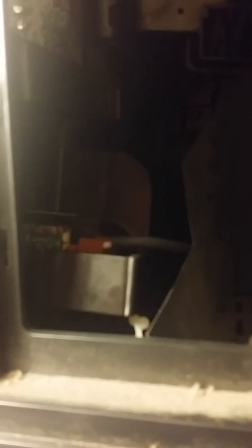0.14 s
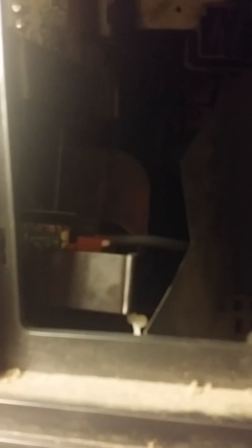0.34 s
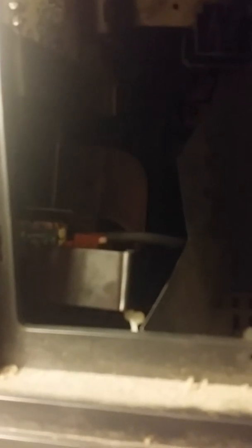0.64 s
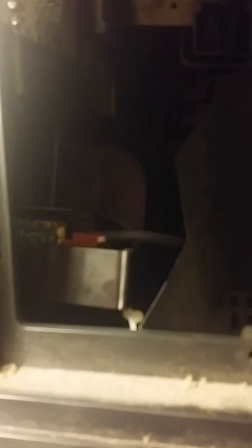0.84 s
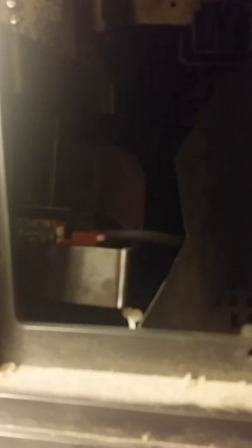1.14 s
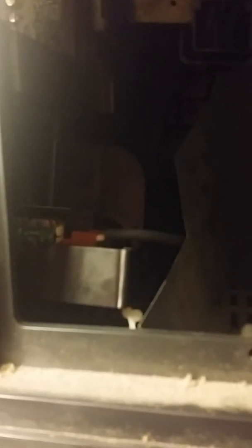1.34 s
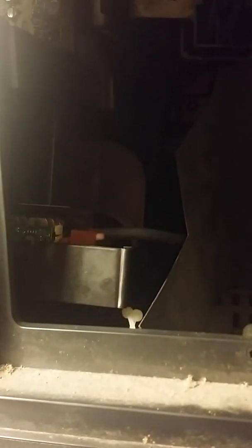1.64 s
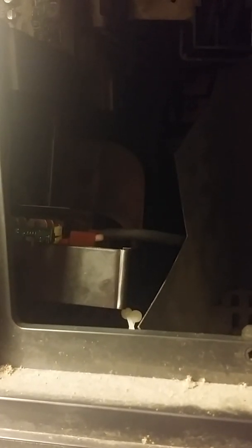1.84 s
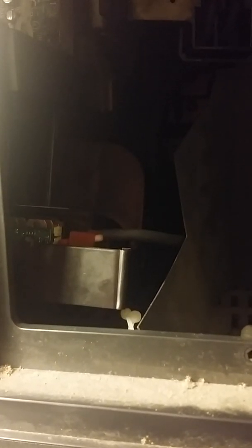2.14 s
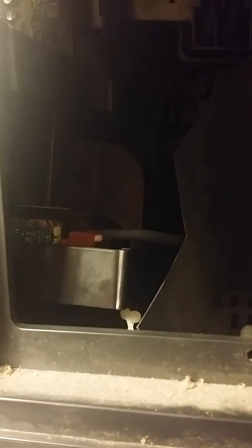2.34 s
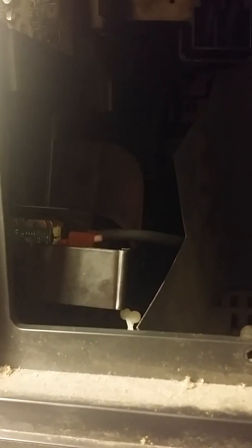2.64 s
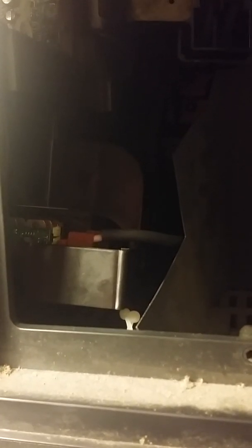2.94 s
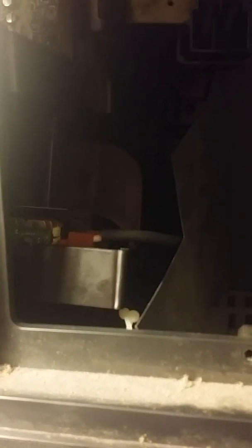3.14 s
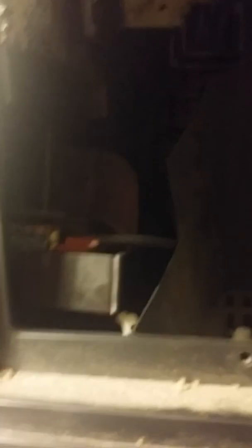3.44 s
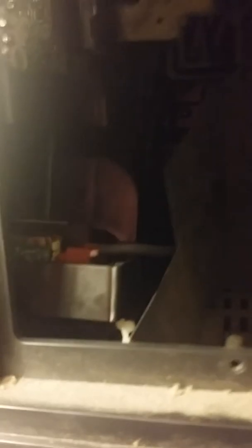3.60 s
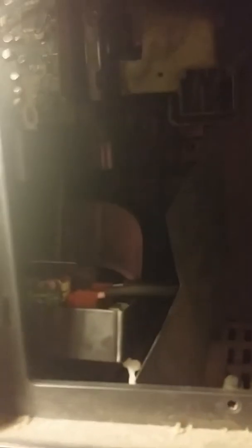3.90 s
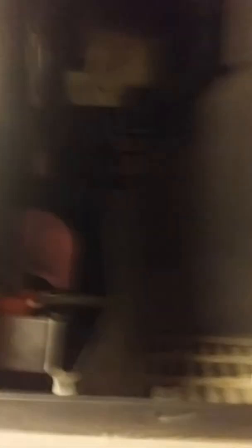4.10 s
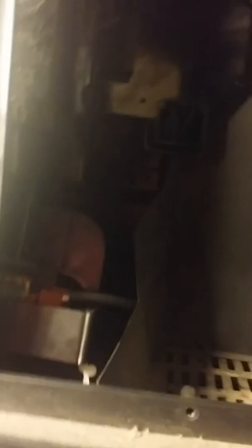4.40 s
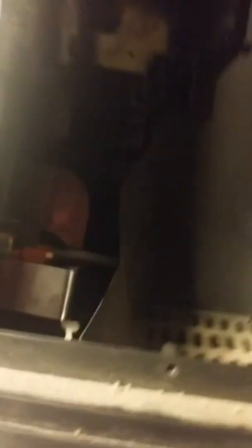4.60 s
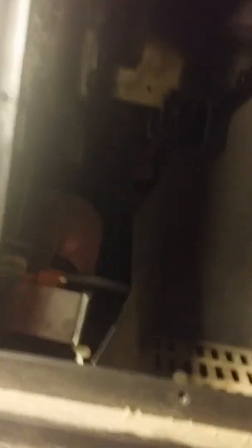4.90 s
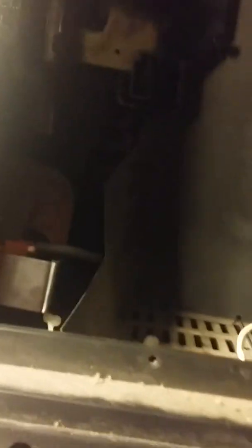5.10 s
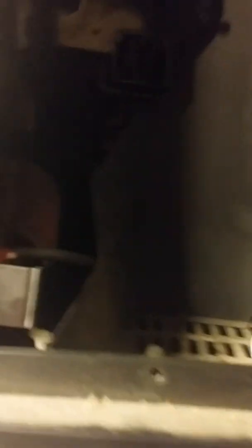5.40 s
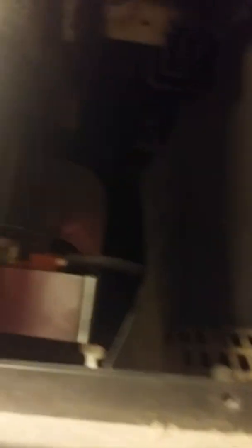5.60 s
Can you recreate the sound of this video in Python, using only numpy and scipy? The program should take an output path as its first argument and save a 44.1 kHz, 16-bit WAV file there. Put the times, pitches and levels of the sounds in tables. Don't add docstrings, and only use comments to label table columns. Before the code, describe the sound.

Close to an open electronics cabinet, cooling fans keep up a steady low hum with soft airflow and a faint motor whine. Around two seconds a single knock sounds across the room. From just after three seconds a finger creeps over the right microphone, building to loud scrapes, pops and low thumps past four seconds. The fan sound dips, then recovers, with faint rubbing at the end.

```python
import sys
import numpy as np
from scipy import signal
from scipy.fft import rfft, irfft, next_fast_len
from scipy.io import wavfile
from scipy.ndimage import uniform_filter1d, minimum_filter1d, map_coordinates

SR = 44100
rng = np.random.default_rng(int(sys.argv[2]) if len(sys.argv) > 2 else 0)


def inscribe(sig):
    pcm = np.round(np.clip(np.atleast_2d(sig).T, -1, 1) * 32767)
    wavfile.write(sys.argv[1], SR, pcm.astype(np.int16))


def to_linear_factor(level_db):
    exponent = np.asarray(level_db, float) / 20
    return 10 ** exponent


N = 253575


def unit(x):
    return x / np.sqrt(np.mean(x ** 2) + 1e-20)


def along(points, f_hz):
    knots_hz, *cols = np.transpose(points)
    return np.array([np.interp(np.log(f_hz + 1), np.log(knots_hz + 1), c) for c in cols])


def curve(rows):
    return np.interp(np.arange(N) / SR, *np.transpose(rows))


def wobble(rate_hz):
    coarse = np.arange(0, N + 32, 32)
    knots = rng.standard_normal(int(N * rate_hz / SR) + 4)
    return np.interp(np.arange(N), coarse, map_coordinates(knots, [coarse * rate_hz / SR]))


def filtered(x, response):
    m = next_fast_len(N + SR // 2)
    return irfft(rfft(x, m) * response(np.fft.rfftfreq(m, 1 / SR)), m)[..., :N]


def coloured(x, table):
    return filtered(x, lambda f: to_linear_factor(along(table, f)[0]))


def peak(f, hz, width_hz):
    return 1j * f * width_hz / (hz * hz - f * f + 1j * f * width_hz)


# f/Hz, coherence/1
LIKENESS = [(60, .97), (400, .87), (900, .5), (2000, .45), (3500, .2), (8000, .1)]
LEAD_S = 17 / 44100


def to_ports(pair, colours):
    def mix(f):
        turn_rad = np.arccos(np.clip(along(LIKENESS, f)[0], 0, 1)) / 2
        return np.array([np.cos(turn_rad), np.sin(turn_rad)])

    def colour_and_lag(f):
        return to_linear_factor(along(colours, f)) * np.exp(-2j * np.pi * f * np.array([[0], [LEAD_S]]))

    mid, side = filtered(pair, mix)
    return filtered(np.array([mid + side, mid - side]), colour_and_lag)


def tone(phase, left_db, right_db, lead_rad, sway_db):
    phase = phase + 2 * np.pi * rng.random()
    level_db = sway_db * wobble(9) + np.array([[left_db], [right_db]])
    return np.sqrt(2) * to_linear_factor(level_db) * np.sin([phase + lead_rad, phase])


# t/s, turns/Hz
SHAFT_SPEED = [(0, 36.32), (2.7, 36.34), (5.75, 36.375)]
# multiple of shaft, left/dB, right/dB, left lead/rad
SHAFT_ORDERS = [(4, -63.3, -60.6, 0.1), (5, -67.0, -65.6, 0.1), (7, -50.7, -45.3, 0.3),
                (8, -68.3, -62.9, 0.4), (12, -69.7, -71.8, 0.5), (14, -67.7, -64.8, 1.0),
                (16, -64.3, -64.2, -0.3), (20, -58.3, -54.6, 0.9), (24, -68.8, -66.2, -1.6),
                (28, -75.7, -58.5, 1.0), (32, -56.5, -64.6, 2.0), (36, -63.7, -64.8, 1.2),
                (40, -73.8, -71.2, 2.9), (44, -72.0, -71.9, 2.5)]
MOVED_ORDERS = {20: (-1.8, 3, 0.18), 28: (3.6, -4, .6), 32: (1, 8.4, -0.61)}


def fan_orders():
    turns = 2 * np.pi * np.cumsum(curve(SHAFT_SPEED) + 0.014 * wobble(3.25)) / SR
    away = curve([(5.15, 0), (5.45, 1)])
    out = 0
    for k, left_db, right_db, lead_rad in SHAFT_ORDERS:
        *shift_db, turn_rad = MOVED_ORDERS.get(k, (0, 0, 0))
        order = tone(k * turns, left_db, right_db, lead_rad + turn_rad * away, sway_db=1.34)
        out += to_linear_factor(np.outer(shift_db, away)) * order
    return out


# f/Hz, left/dB, right/dB, left lead/rad
STEADY_TONES = [(56.7, -60.0, -54.6, -0.1), (120, -62.5, -50.1, -0.1), (409.7, -66.7, -66.5, 1.0),
                (546.9, -61.9, -66.1, 0.8), (683.7, -67.7, -59.9, 0.3), (992.5, -77.2, -61.2, 1.7),
                (1136, -68.6, -73.1, -1.4), (1667.5, -62.5, -69.5, -2.0), (1916, -77.6, -76.8, -1.3)]


def hum_and_second_motor():
    clock = 2 * np.pi * np.arange(N) / SR
    out = 0
    for hz, *rest in STEADY_TONES:
        out += tone(hz * clock + hz / 1500 * wobble(3.835), *rest, sway_db=1.5)
    return out


# f/Hz, width/Hz, left/dB, right/dB
MOTOR_FRAME = [(4800, 600, -76, -84), (5140, 260, -78, -79), (6250, 800, -69, -84), (10700, 700, -88, -74),
               (14200, 900, -84, -70)]


def motor_whine():
    count = np.floor(np.cumsum(136.77 * (1 + 0.0008 * wobble(6))) / SR)
    ticks = unit(np.diff(count, prepend=0) * (-1) ** count * to_linear_factor(2.5 * rng.standard_normal(N)))
    echoes = rng.standard_normal((2, 2000)) * to_linear_factor(-60 * np.arange(2000) / SR / .06)
    ticks = unit(signal.fftconvolve(ticks[None], echoes, axes=1)[:, :N])

    def frame(f):
        return sum(np.outer(to_linear_factor(db), peak(f, hz, w) ** 2) * np.sqrt(SR / w / 0.79)
                   for hz, w, *db in MOTOR_FRAME)

    return filtered(ticks, frame) * to_linear_factor(curve([(3.6, 0.5), (4.6, -2.5)]))


def grains(rate_hz, spread_db):
    hit, size, sign = rng.random((3, N))
    return (hit < rate_hz / SR) * to_linear_factor(-spread_db * np.log(size + 0.0098)) * np.sign(sign - .5)


# t/s, length/s, speed level/dB, pressure/0-1
CREEPS = [
    (3.25, .085, -55, .3),
    (3.364, 0.044, -62, 0.72),
    (3.425, 0.19, -54, 0),
    (3.591, 0.081, -47.5, 0),
    (3.675, .13, -47, 0),
    (3.81, .071, -42, 0.02),
    (5.232, 0.33, -60.5, 0.3),
]
# t/s, length/s, speed level/dB, pressure/0-1, swell/dB
SLIDES = [(3.875, 0.031, -48.5, 0, -8), (3.928, .024, -30, 0.39, -11.5), (3.953, 0.055, -34, 0.09, 0),
          (3.997, .05, -46, 0.19, 11), (4.049, 0.039, -37, 0.06, -2), (4.08, 0.036, -49.5, .4, 5),
          (4.12, 0.09, -34, 0.47, -3), (4.211, 0.074, -42, 0, -9), (4.285, 0.018, -32.5, 1.02, 13),
          (4.306, 0.018, -38, 1.03, -13), (4.336, 0.072, -39, 1, 6), (4.404, .063, -40.5, 0.99, 8),
          (4.467, 0.045, -39, 1.01, 3), (4.519, 0.084, -48, 0.65, -1), (4.59, .11, -67.5, 0.75, 13),
          (5.422, .2, -60.5, 0.1, 22), (5.62, .14, -51, 0, 0)]
CREEP_SWELL_DB = 5.5
BOOM_DB, BOOM_PRESSED_DB, BOOM_BENDS = -18.5, 40.5, 1.94
SCRAPE_DB, SCRAPE_PRESSED_DB = -6, 18.5


def finger_strokes():
    t, gains = np.arange(N) / SR, np.full((3, N), 1e-9)
    strokes = [(*row, CREEP_SWELL_DB) for row in CREEPS] + SLIDES
    for s, length_s, speed_db, press, swell_db in strokes:
        near = slice(round((s - .01) * SR), round((s + length_s + .01) * SR))
        u = (t[near] - s) / length_s
        edge = np.clip(np.minimum(u, 1 - u) * length_s / .005 + .5, 0, 1)
        boom_db = BOOM_DB + BOOM_PRESSED_DB * abs(press) ** BOOM_BENDS
        layers_db = np.array([boom_db, SCRAPE_DB + SCRAPE_PRESSED_DB * press, 0])
        gains[:, near] += edge * to_linear_factor(speed_db + layers_db[:, None] + swell_db * (np.clip(u, 0, 1) - .5))
    return gains


# f/Hz, width/Hz, level/dB
PORT_CAVITY = [(420, 510, 5.5), (650, 170, -12)]


def cavity_boom():
    def cavity(f):
        rings = sum(to_linear_factor(db) * peak(f, hz, w) for hz, w, db in PORT_CAVITY)
        return rings ** 2 / (1 + (f / 900) ** 8)

    return unit(filtered(grains(rate_hz=800, spread_db=1.0), cavity))


# f/Hz, level/dB per Hz
SCRAPE_COLOUR = [(60, -11), (200, -16), (750, -3), (1200, -2.5), (2800, -3.5), (5000, -12.5), (7500, -31),
                 (9000, -42)]


def skin_scrape(cover):
    def open_and_covered(f):
        return to_linear_factor(along(SCRAPE_COLOUR, f)) * [1 + 0 * f, 1 / (1 + (f / 1500) ** 2)]

    open_port, covered = filtered(grains(rate_hz=3700, spread_db=2.5), open_and_covered)
    return 1.46 * ((1 - cover) * unit(open_port) + cover * unit(covered))


# f/Hz, level/dB per Hz
FIZZ_COLOUR = [(3000, -24), (6000, -7), (7700, -9), (9500, -3), (13000, -4), (15500, -6)]
# f/Hz, level/dB
CASE_LEAK = [(1500, -40), (4300, -2), (6500, 19), (8500, 2), (11000, -18), (15500, -30)]


def finger():
    gains = finger_strokes()
    cover = np.clip(gains[0] / gains[1], 0, 1)
    fizz = unit(coloured(grains(rate_hz=25000, spread_db=1.6), FIZZ_COLOUR))
    lumps = to_linear_factor([2.8 * wobble(60), 2.3 * wobble(80), 1.1 * wobble(60)])
    right = (gains * lumps * [cavity_boom(), skin_scrape(cover), fizz]).sum(0)
    leak = unit(coloured(grains(rate_hz=8000, spread_db=2), CASE_LEAK))
    leak *= to_linear_factor(-38) * gains[0] + to_linear_factor(-26) * gains[2]
    return np.array([leak, right])


TOUCH_T = np.arange(SR // 20) / SR


def touch_span(s):
    start = round((s - .0003) * SR)
    return slice(start, start + len(TOUCH_T))


def swing(hz):
    turns = hz * TOUCH_T
    return -1.4 * np.sin(2 * np.pi * (turns - .3)) * np.exp(-((turns - .75) / 0.41) ** 2)


def crack():
    grit = rng.standard_normal((2, len(TOUCH_T) + 1))
    return 0.38 * (grit[:, 1:] + 0.3 * grit[:, :-1]) * to_linear_factor(-60 * TOUCH_T / 0.0053)


def through_port(x):
    return filtered(x[:, :N], lambda f: (1j * f / (49 + 1j * f)) ** 2)


# t/s, push/dB, push f/Hz, crack over push/dB
SKIN_POPS = [(.022, -37.5, 2490, 3), (3.2536, -28, 1950, -11), (3.2574, -24, 1050, -10),
             (3.3131, -18, 930, -10), (3.3457, -18, 1900, -3), (3.643, -33, 1100, -13),
             (3.759, -30, 1080, -15), (3.779, -30.5, 1360, -11), (3.9234, -17.5, 2390, 2),
             (3.9924, -8, 900, -18.5), (4.0505, -26.5, 900, 19), (4.1167, -8, 525, -25),
             (4.2237, -10, 1120, 3.5), (4.2653, -22, 1190, -8), (4.2763, -21, 1200, -13),
             (4.2831, 5.5, 496, -17), (4.337, 5, 480, -32), (4.3965, -36, 2000, 14),
             (4.408, -2.5, 2200, -19), (4.4992, 0.5, 790, -5.5), (4.682, -38, 1500, -9.5),
             (4.831, -43.5, 2000, 18)]
CASE_DB, CASE_GROWS = -41, 0.68


def pops():
    out = np.zeros((2, N + SR))
    ring = to_linear_factor(-8 - 60 * TOUCH_T / 0.004) * np.sin(2 * np.pi * 2500 * TOUCH_T)
    for s, push_db, hz, crack_db in SKIN_POPS:
        out[:, touch_span(s)] += crack() * to_linear_factor([[CASE_DB + CASE_GROWS * push_db], [push_db + crack_db]])
        out[1, touch_span(s)] += to_linear_factor(push_db) * (swing(hz) + ring)
    return through_port(out)


# t/s, push/dB, push f/Hz
SKIN_THUMPS = [
    (3.314, -29, 348),
    (3.485, -31.5, 119),
    (3.786, -28, 90),
    (3.93, -26.5, 112),
    (3.991, -19.5, 185),
    (4.116, -17.5, 119),
    (4.341, -3.5, 452),
    (4.501, -10, 118),
    (5.48, -32.5, 292),
]


def thumps():
    out = np.zeros((2, N + SR))
    for s, push_db, hz in SKIN_THUMPS:
        out[1, touch_span(s)] += to_linear_factor(push_db) * swing(hz)
    return through_port(out)


# t/s, level/dB
CASE_TAPS = [
    (3.756, -20),
    (4.131, -39),
    (4.2236, -30),
    (4.2829, -21),
    (4.337, -27),
    (4.408, -26),
]


def taps():
    out = np.zeros((2, N + SR))
    for s, db in CASE_TAPS:
        out[0, touch_span(s)] += to_linear_factor(db) * crack()[0]
    return through_port(out)


# f/Hz, left/dB per Hz, right/dB per Hz
KNOCK_COLOUR = [(90, -8, 0.5), (200, -3.5, 0), (400, -1, 1.5), (740, 0, 5.5), (1500, -4, -2.5),
                (2400, -9.4, -6.5), (2960, -7, -8), (4500, -9.5, -11.5), (7000, -10.5, -14.6),
                (10000, -19.5, -10), (14500, -27, -15)]
# f/Hz, t60/s
ROOM_DECAY = [(100, 0.68), (700, 0.24), (5000, 0.32), (13000, 0.3)]


def knock():
    hz, t, z = signal.stft(rng.standard_normal((2, SR // 2)), SR, nperseg=256)
    tail = signal.istft(z * to_linear_factor(-60 * t / along(ROOM_DECAY, hz).T), SR, nperseg=256)[1]
    t = np.arange(tail.shape[1]) / SR
    panel = 0.45 * np.sin(2 * np.pi * 200 * t) * to_linear_factor(-60 * t / 0.22) * (1 - np.exp(-t / 0.028))
    panel += 0.3 * np.sin(2 * np.pi * 740 * t) * to_linear_factor(-60 * t / 0.16) * (1 - np.exp(-t / 0.008))
    tail = (tail + [panel, 0 * t]) * (1 - np.exp(-t / 0.0059))
    start = round(1.9395 * SR)
    return to_linear_factor(-12) * to_ports(np.pad(tail, ((0, 0), (start, N)))[:, :N], KNOCK_COLOUR)


# f/Hz, left/dB per Hz, right/dB per Hz
AIR_COLOUR = [(35, -20.5, -18.4), (60, 2.7, 8.3), (130, -2.0, 2.7), (250, -5.2, -0.3), (340, -9.8, -4.9),
              (750, -6.1, -1.1), (1100, -12.9, -5.4), (1850, -16.3, -10.6), (2200, -20.4, -18.7),
              (3700, -23.9, -23.9), (6300, -21.1, -26.3), (8000, -30.0, -28.6), (11000, -30.2, -23.0),
              (15500, -31.6, -28.5)]
# f/Hz, width/Hz, left/dB, right/dB
CABINET_WAVES = [(85, 40, -6, -6), (190, 60, -3, -3), (330, 40, -1, 2), (480, 70, -2, -5),
                 (620, 50, -3, -5), (920, 70, -2, -6), (1080, 50, -5, 0), (1330, 170, 0, -5),
                 (1570, 60, -3, -6), (3800, 500, -1.5, -1), (5150, 110, 1, 5.5), (6650, 400, 0, -3),
                 (8000, 500, -2.5, -3)]


def fan_air():
    z = signal.stft(rng.standard_normal((2, N)), nperseg=512)[2]
    patches = uniform_filter1d(rng.standard_normal(z.shape[1:]), size=6, axis=0)
    patches = uniform_filter1d(patches, size=12, axis=1)
    pair = signal.istft(z * to_linear_factor(.7 * unit(patches)), nperseg=512)[1][:, :N]

    def standing_waves(f):
        return to_linear_factor(sum(np.outer(db, np.exp(-((f - hz) / w) ** 2)) for hz, w, *db in CABINET_WAVES))

    return to_linear_factor(-30.5) * filtered(to_ports(pair, AIR_COLOUR), standing_waves)


def scene():
    fans = fan_orders() + hum_and_second_motor() + motor_whine()
    touches = finger() + pops() + thumps() + taps()
    return fans + touches + knock() + fan_air()


def top_cut(x):
    return signal.sosfilt(signal.butter(12, 16470, fs=SR, output="sos"), x)


DUCK_S, ATTACK_S, HOLD_S = 4.235, 0.051, 0.86
DUCK_DB, RECOVER_DB_PER_S = -5, 10.5


def record(dry):
    t = np.arange(N) / SR - DUCK_S
    gain_db = DUCK_DB * np.clip(t / ATTACK_S, 0, 1)
    gain_db += RECOVER_DB_PER_S * np.maximum(t - ATTACK_S - HOLD_S, 0)
    x = filtered(dry, lambda f: (1j * f / (34 + 1j * f)) ** 2 * (f < 15480)) * to_linear_factor(gain_db)
    need = np.minimum(1, 0.68 / (np.abs(x).max(0) + 1e-9))
    duck = uniform_filter1d(minimum_filter1d(need, size=500), size=400)
    x = x * np.roll(duck, shift=400) - .0005
    return top_cut(np.clip(x, -.99, .99))


dry = scene()
out = record(dry)
inscribe(out)
```